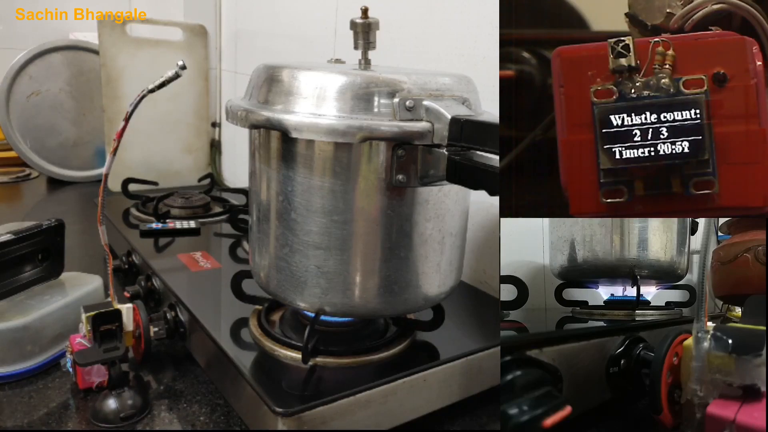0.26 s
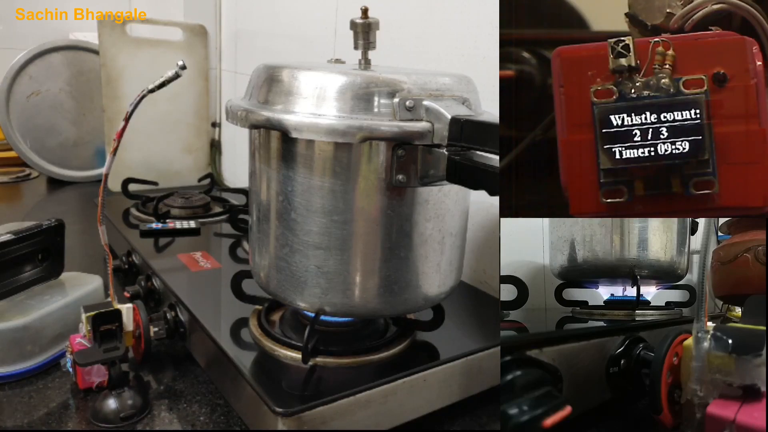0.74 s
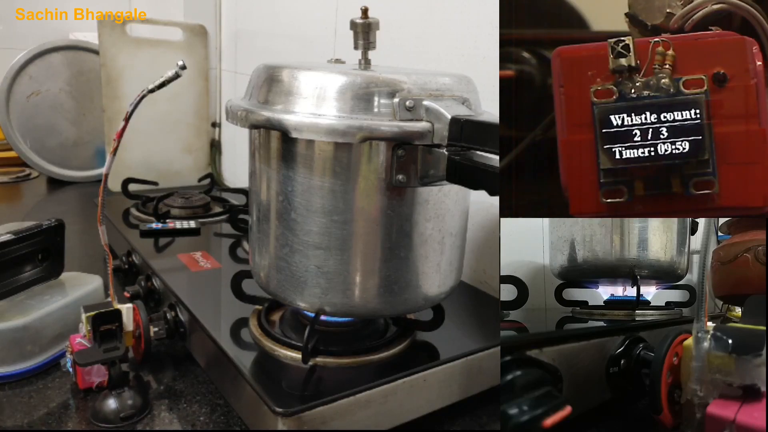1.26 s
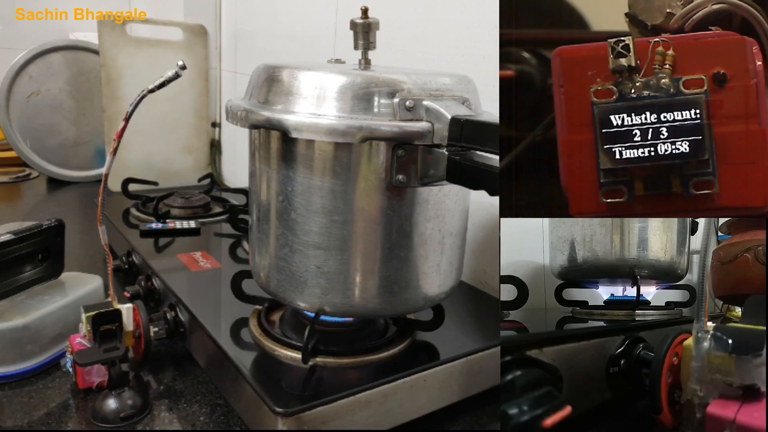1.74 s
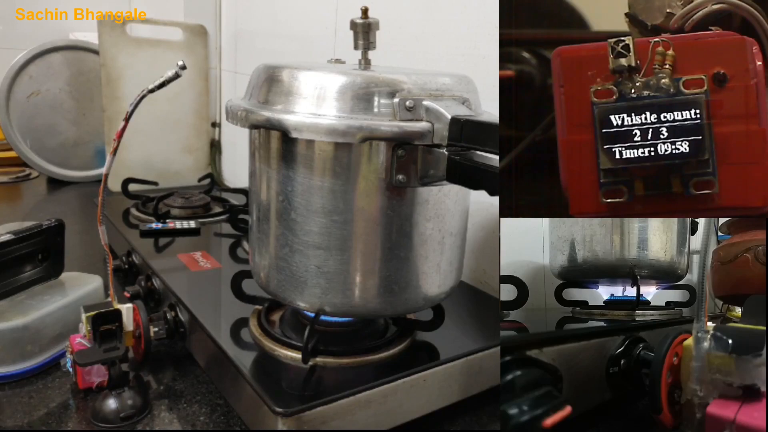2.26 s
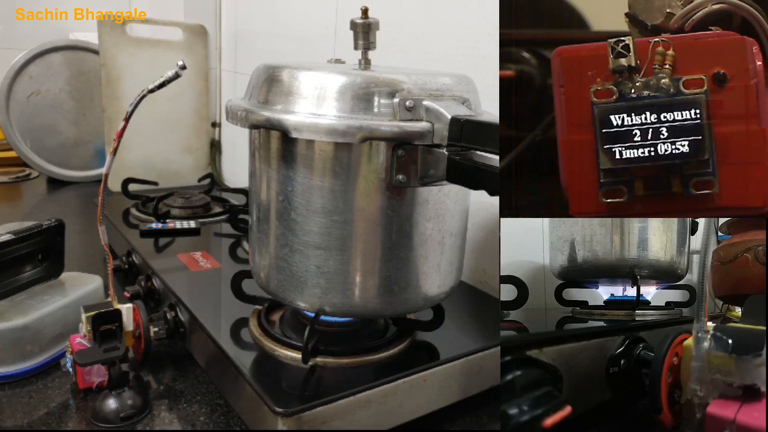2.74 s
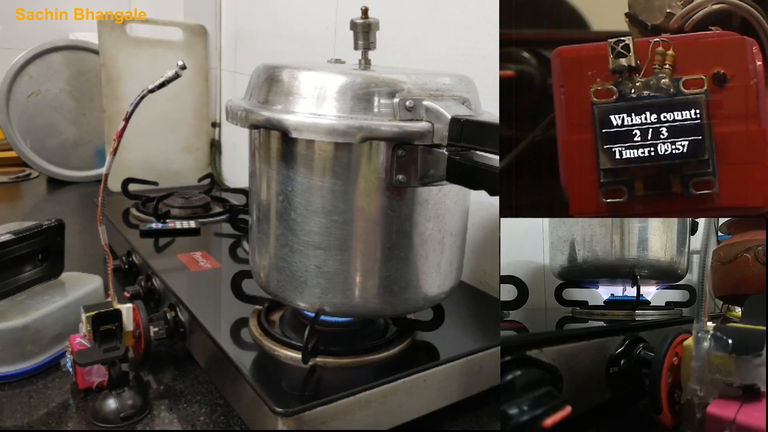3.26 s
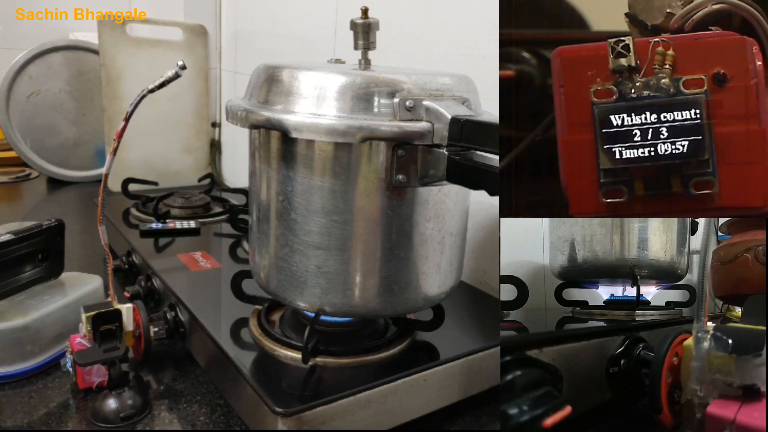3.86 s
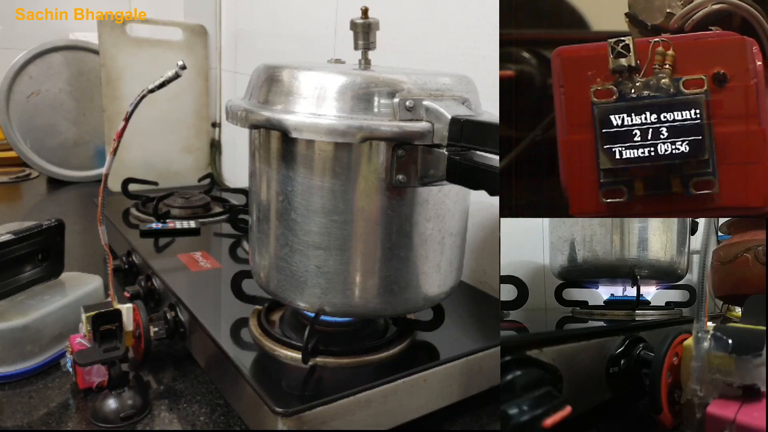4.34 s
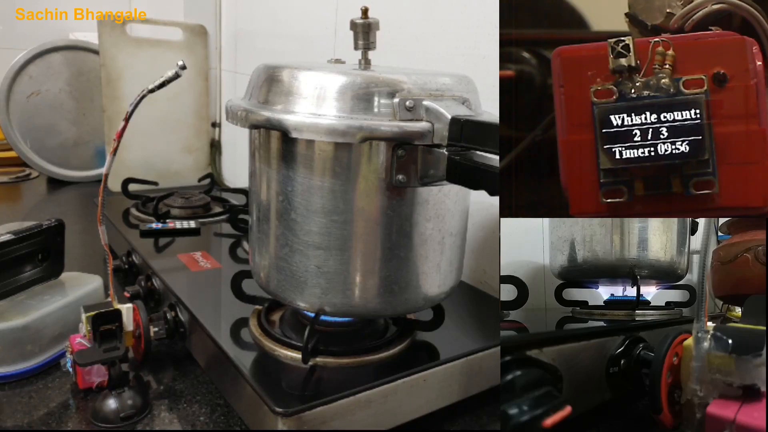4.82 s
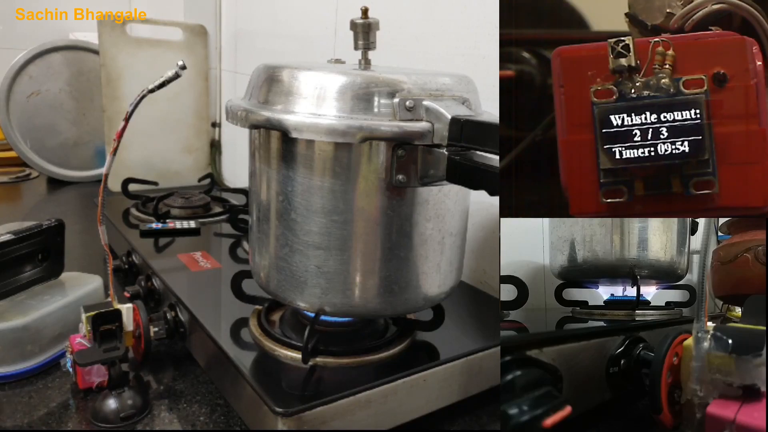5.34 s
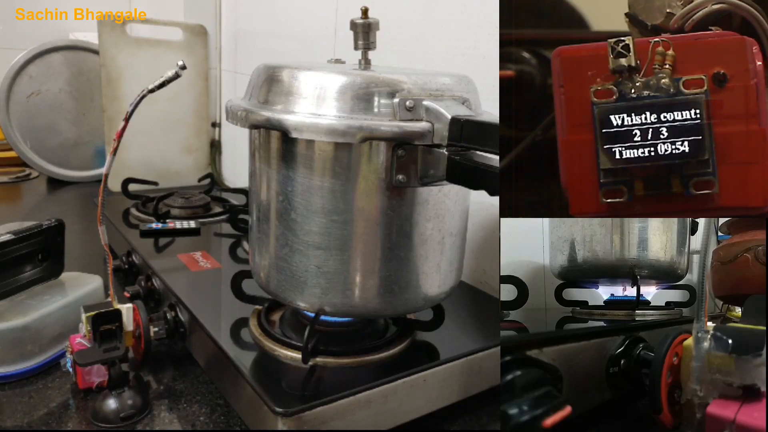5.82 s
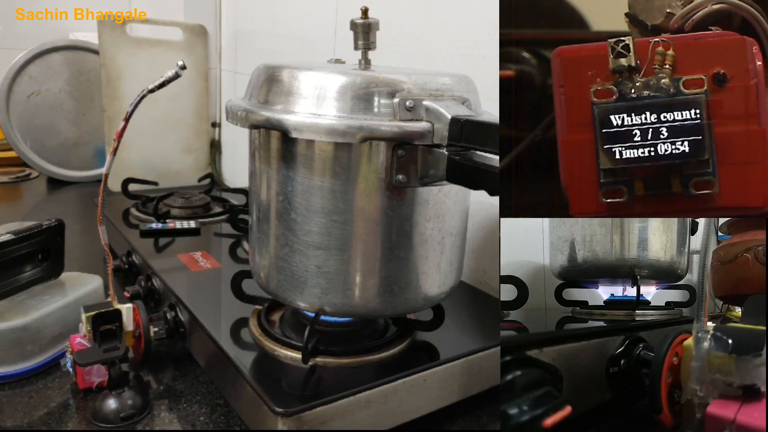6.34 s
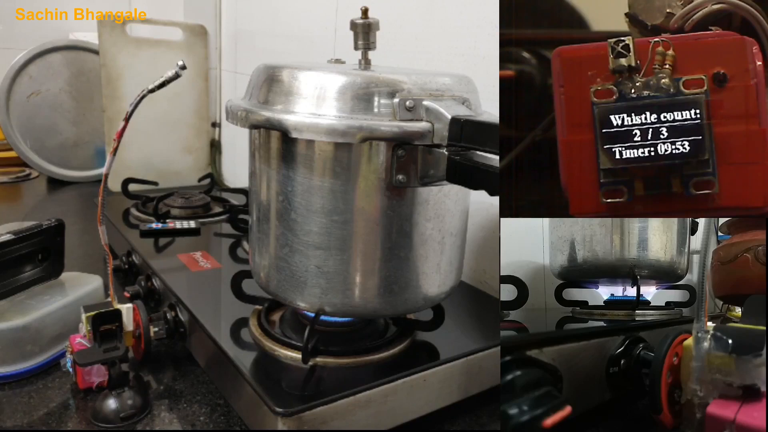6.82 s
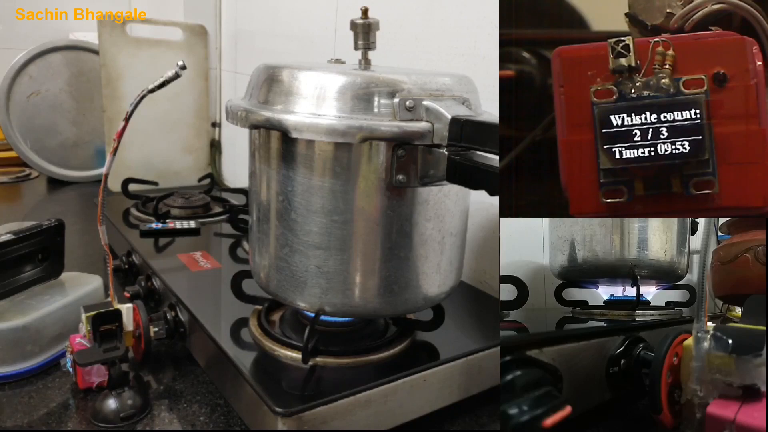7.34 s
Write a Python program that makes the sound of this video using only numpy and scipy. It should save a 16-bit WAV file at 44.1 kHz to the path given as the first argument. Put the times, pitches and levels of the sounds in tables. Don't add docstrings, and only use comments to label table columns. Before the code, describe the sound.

Loud gritty steam hiss pours from a cooker valve over low bubbling thuds, sagging slightly before the weight clatters shut and cuts it off.

```python
import sys
import numpy as np
from scipy import signal
from scipy.fft import rfft, irfft
from scipy.io import wavfile

SR = 44100
rng = np.random.default_rng(int(sys.argv[2]) if len(sys.argv) > 2 else 0)


def volts_from_db(level):
    exponent = np.asarray(level, float) / 20
    return 10 ** exponent


def int16_out(signal):
    q = np.round(np.clip(np.atleast_2d(signal).T, -1, 1) * 32767)
    wavfile.write(sys.argv[1], SR, q.astype(np.int16))


N = 334719
SHUT_S = 7.488


def evened(x):
    return x / np.sqrt(np.mean(x ** 2) + 1e-20)


def read_spectrum(points, hz):
    f, level_db = np.transpose(points)
    return np.interp(np.log(hz + 1), np.log(f + 1), level_db)


def wander(hz):
    return evened(signal.lfilter(*signal.butter(2, hz, fs=SR), rng.standard_normal(N)))


# f/Hz, level/dB (per Hz)
ROAR_SPECTRUM = [(80, -2.5), (250, -3.5), (600, -3), (1300, -2.5), (2400, -1.5), (3500, -3)]


def roar():
    hz, t = np.fft.rfftfreq(N, 1 / SR), np.arange(N) / SR
    colour = volts_from_db(read_spectrum(ROAR_SPECTRUM, hz)) * (hz < 4500)
    noise = evened(irfft(rfft(rng.standard_normal(N)) * colour, N))
    thinning_db = -90 * np.maximum(t - SHUT_S, 0)
    return volts_from_db(-35 + 0.5 * wander(hz=5.0) + thinning_db) * noise


# low f/Hz, high f/Hz, level/dB
SIDE_BANDS = [(5150, 6300, -27), (7550, 8250, -37), (8250, 9000, -48)]


def side_burst():
    centre_s, length_s = 1.508, .044
    t, hz = np.arange(N) / SR, np.fft.rfftfreq(N, 1 / SR)
    noise = rfft(rng.standard_normal(N))
    bands = np.zeros(N)
    for low, high, db in SIDE_BANDS:
        bands += volts_from_db(db) * evened(irfft(noise * (hz > low) * (hz < high), N))
    return bands * np.clip(2 - 4 * abs(t - centre_s) / length_s, 0, 1) ** 2


# t/s, level/dB (peak), f/Hz
WATER_SPITS = [(0.073, -23, 975), (0.135, -28, 410), (0.354, -25.5, 738), (0.39, -24, 335),
               (0.816, -26, 379), (0.98, -27, 425), (1.016, -29.5, 870), (1.147, -25, 405),
               (1.293, -24, 633), (1.325, -26, 230), (1.466, -24.5, 650), (1.718, -25.5, 677),
               (1.858, -26, 400), (2.173, -29, 352), (2.174, -26, 990), (2.373, -29, 235), (3.267, -27, 372),
               (3.402, -24, 250), (3.498, -22, 740), (3.657, -30, 296), (3.666, -26.5, 536),
               (3.818, -24, 538), (3.878, -25, 557), (4.056, -25, 883), (4.701, -26, 427), (5.22, -30, 244),
               (6.645, -22.5, 550), (7.12, -27, 219), (7.259, -24, 248), (7.356, -27.5, 247),
               (0.15, -30, 715), (0.634, -29, 290), (0.848, -29, 664), (0.978, -25, 627), (1.112, -34, 850),
               (1.327, -32, 355), (2.395, -33, 395), (2.649, -28, 215), (2.769, -29.5, 190),
               (2.873, -32, 279), (2.963, -29, 326), (3.088, -34, 258), (3.168, -27.5, 317),
               (3.41, -25, 419), (4.086, -30, 538), (4.565, -30, 460), (5.507, -33, 269),
               (5.517, -25.5, 592), (5.567, -27, 267), (5.645, -30, 302), (5.72, -31, 189),
               (5.993, -34, 396), (6.072, -31, 347), (6.225, -35, 540), (1.48, -29, 794), (1.72, -32, 780),
               (5.178, -30, 265), (6.66, -33, 826), (7.488, -34, 243),
               (0.566, -29.5, 147), (0.786, -27, 145), (1.075, -27.5, 150), (1.224, -29, 170),
              (1.411, -25, 175), (1.43, -29, 120), (1.818, -30, 145), (2.169, -29, 141), (2.304, -31, 140),
              (2.332, -21.5, 130), (2.425, -34.5, 220), (2.795, -36, 216), (3.007, -27.5, 148),
              (3.227, -30, 150), (3.545, -32.5, 150), (3.823, -29, 145), (3.96, -28, 145),
              (4.374, -27, 160), (4.456, -21, 150), (4.478, -23.5, 180), (4.521, -30.5, 190),
              (4.565, -35, 235), (4.87, -32, 190), (4.896, -31.5, 125), (5.031, -29, 136),
              (5.078, -26.5, 110), (5.158, -27.5, 155), (5.253, -27.5, 161), (5.361, -28, 119),
              (6.134, -30, 139), (6.251, -26, 185), (6.618, -33, 146), (6.749, -35.5, 140),
               (1.155, -28, 320), (1.17, -32, 496), (3.262, -33, 520), (3.275, -31, 300), (3.37, -28, 780),
              (3.375, -34, 590), (3.449, -32, 432), (3.485, -32, 780), (3.655, -30, 730), (3.66, -29, 200),
              (3.68, -27, 555), (3.715, -28, 500), (4.429, -29, 350), (4.589, -32, 380), (4.73, -31, 405),
              (6.215, -32, 480), (6.637, -30, 560), (6.765, -31, 710), (6.805, -32, 343), (6.705, -30, 403),
              (7.0, -19, 1980), (7.13, -32, 330)]


def spits(small_db, small_count):
    small = rng.random((small_count, 3)) * [7.4, 9, 2.6] + [.03, small_db, np.log(80)]
    small[:, 2] = np.exp(small[:, 2])
    rows = np.vstack([WATER_SPITS, small])
    out = np.zeros(N)
    flutter_depth = .15
    flutter = 1 + flutter_depth * wander(hz=150)
    for (s, db, hz), (turn, glide) in zip(rows, rng.random((len(rows), 2))):
        length_s = .036 + 0.011 * hz / 1000
        t = np.arange(-.33 * length_s, 0.37 * length_s, 1 / SR)
        cycles = hz * t * (1 + 0.68 * (glide - .5) * t / length_s) + turn
        second_db = -10 - 5.5 * abs(np.log2(hz / 260))
        bubbles = np.sin(2 * np.pi * cycles)
        bubbles += volts_from_db(second_db) * np.sin(2 * np.pi * 1.64 * cycles)
        part = out[round((s + t[0]) * SR):][:len(t)]
        part += volts_from_db(db + 8.0 - 7.0 * hz / 1000) * (np.hanning(len(t)) * bubbles)[:len(part)]
    return out * flutter / np.sqrt(1 + flutter_depth ** 2)


# t/s, level/dB (peak), f/Hz
WEIGHT_KNOCKS = [(7.474, -25, 641), (7.487, -29, 731), (7.511, -21.5, 741), (7.523, -28, 930),
                 (7.554, -24, 980), (7.52, -28, 2350), (7.519, -11.5, 681), (7.529, -14.5, 1245),
                 (7.534, -27, 640), (7.542, -11, 1209), (7.543, -28, 2281), (7.548, -25, 1021),
                 (7.552, -15.5, 1209), (7.559, -19.5, 621), (7.561, -16.5, 1205), (7.578, -23, 700),
                 (7.576, -27, 1211), (7.574, -24, 810), (7.535, -26, 1081), (7.565, -28, 1121)]


def weight():
    out = np.zeros(N + SR)
    t, rise_s = np.arange(SR // 4) / SR, .007
    rows = [(s, db, hz, .023 + .0022 * (-12 - db)) for s, db, hz in WEIGHT_KNOCKS]
    rows.append((7.514, -26, 1500, .3))
    for (s, db, hz, t60), turn in zip(rows, rng.random(len(rows))):
        swell = np.sin(np.pi / 2 * np.minimum(t / rise_s, 1)) ** 2
        decay = volts_from_db(-60 * np.maximum(t - rise_s, 0) / t60)
        mode = np.sin(2 * np.pi * (hz * t + turn))
        out[round(s * SR):][:len(t)] += volts_from_db(db) * swell * decay * mode
    band = signal.butter(2, [600, 3200], "band", fs=SR)
    rattle = evened(signal.lfilter(*band, rng.standard_normal(len(t))))
    rattle *= volts_from_db(-26 - 60 * t / 0.85) * np.minimum(t / 0.0032, 1)
    out[round(7.512 * SR):][:len(t)] += rattle
    return out[:N]


def kitchen(x, t60, wet_db):
    at = np.arange(60, 8000, 20)
    taps = np.zeros(8020)
    signs = rng.choice([-1., 1.], len(at))
    taps[at + rng.integers(0, 20, len(at))] = signs * volts_from_db(-60 * at / SR / t60)
    return x + volts_from_db(wet_db) * signal.oaconvolve(x, taps / np.linalg.norm(taps))[:N]


# f/Hz, level/dB (per Hz)
JET_SPECTRUM = [(60, -17.5), (500, -22.5), (1300, -16), (1700, -10.5), (2200, -5.5), (2600, -8), (3050, -6),
                (3500, -3), (4300, -0.5), (4950, 0.5), (5500, -2.5), (6550, 1.5), (7400, 0), (9000, -3.5)]
# f/Hz, width/Hz, prominence/dB
JET_RINGS = [(3786, 40, 2), (3926, 20, 2), (4154, 30, 1.5), (4240, 25, 2), (4350, 22, 3.2), (4669, 18, 2.5),
             (4981, 22, 3.5), (5429, 30, 2.3), (5633, 20, 2.6), (5948, 24, 2.9), (6237, 22, 2),
             (6448, 30, 2), (6550, 27, 2.5), (6794, 20, 2.2),
             (3552, 25, 1.9), (4565, 70, 1.8), (4898, 20, 1.5), (5211, 30, 1.4), (5351, 50, 1.6),
             (5684, 20, 1.5), (5800, 90, 1.2), (6100, 60, 1.6), (6890, 18, 1.5), (7084, 22, 1.3),
             (7245, 20, 1.3), (7310, 20, 1.8), (7461, 22, 1.5), (7622, 22, 2.4)]


def jet():
    hz, t = np.fft.rfftfreq(N, 1 / SR), np.arange(N) / SR
    rings_db = np.zeros(len(hz))
    for f, width, db in JET_RINGS:
        rings_db += db / (1 + (2 * (hz - f) / width) ** 2)
    colour = volts_from_db(read_spectrum(JET_SPECTRUM, hz) + 2.9 * rings_db)
    gusts = volts_from_db(.1 * wander(hz=7.4) + .1 * wander(hz=91.0))
    flow = irfft(rfft(gusts * rng.standard_normal(N)) * colour, N)
    hiss = kitchen(flow, t60=.35, wet_db=-10)
    drift_db = -0.12 * t
    sag_db = -10 * np.maximum(t - 7.33, 0)
    shut_db = -112 * np.maximum(t - SHUT_S, 0)
    return volts_from_db(-13.9 + drift_db + sag_db + shut_db) * evened(hiss)


def scene():
    hiss, water = jet(), spits(small_db=-51, small_count=170)
    return np.array([hiss - .8 * water, 1.25 * water + weight() + roar()])


def top_cut(x):
    return signal.sosfilt(signal.butter(12, 9270, fs=SR, output="sos"), x)


def record(dry):
    rate_hz, up, down = 16000, 441, 160
    full_scale = volts_from_db(-11.55)
    hiss, body = signal.resample_poly(dry, down, up, axis=1)
    mono = np.where(abs(hiss) > full_scale, -full_scale, hiss) + body
    bass_cut = signal.butter(2, 107, "high", fs=rate_hz, output="sos")
    mono = signal.sosfiltfilt(bass_cut, mono)
    smoothing = signal.firwin(35 * up + 1, 8080, window=("kaiser", 9), fs=up * rate_hz)
    fine = signal.resample_poly(np.append(mono, 0), up, down, window=smoothing)[:N]
    mix = fine + np.outer([1, -1], side_burst())
    return top_cut(mix)


dry = scene()
out = record(dry)
int16_out(out)
```